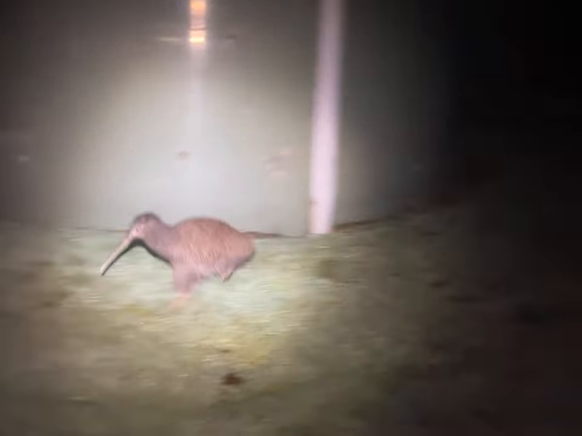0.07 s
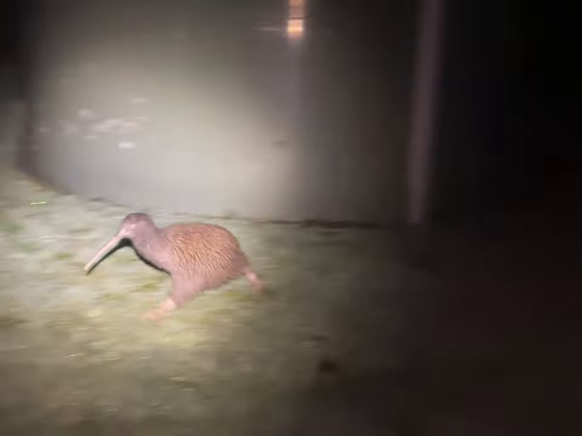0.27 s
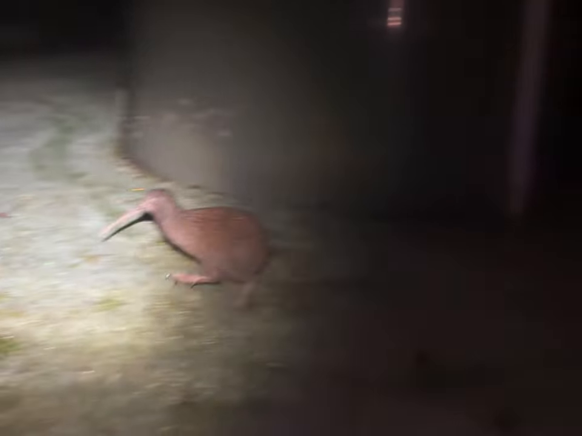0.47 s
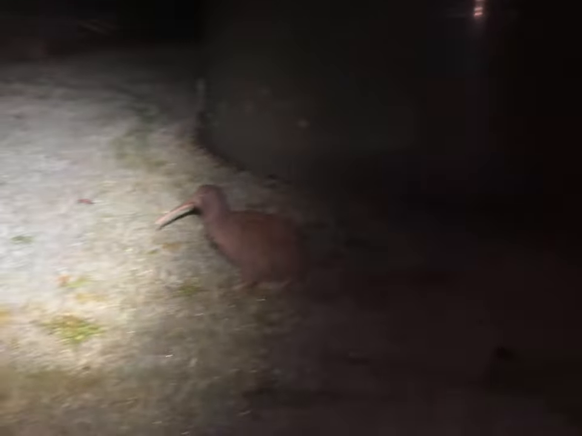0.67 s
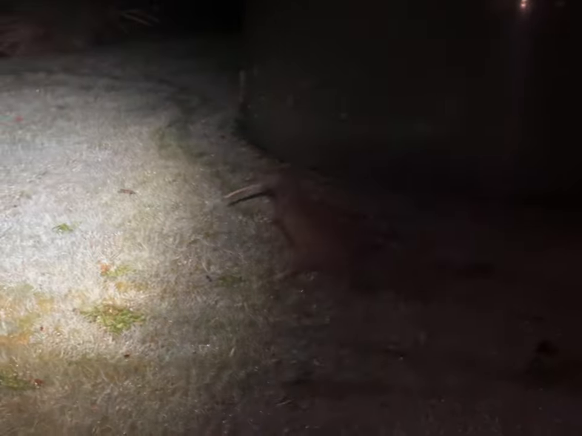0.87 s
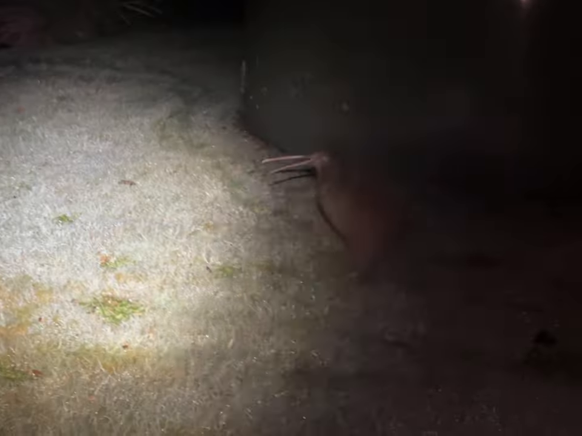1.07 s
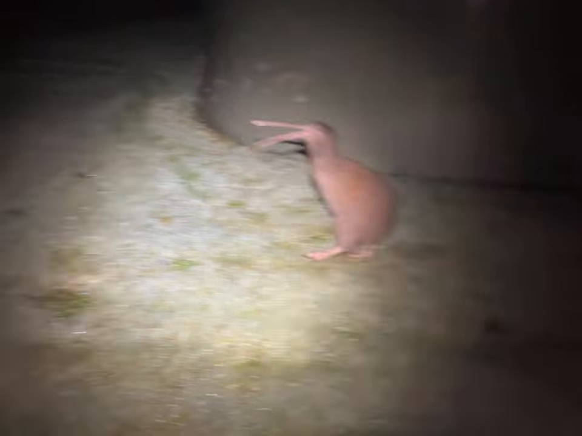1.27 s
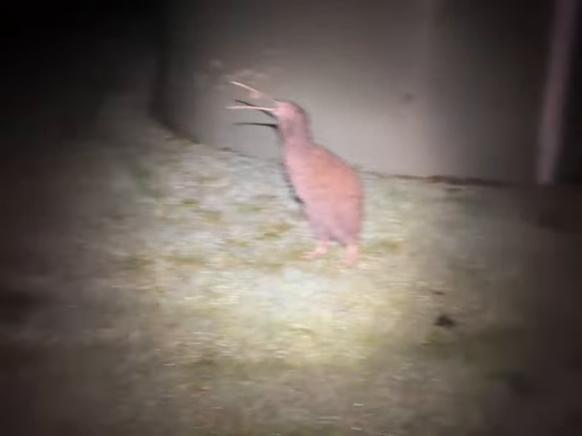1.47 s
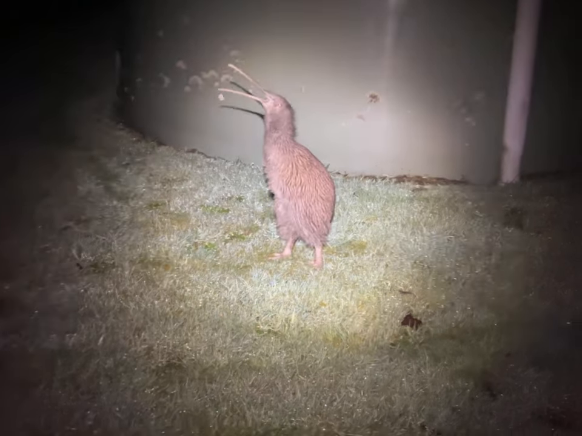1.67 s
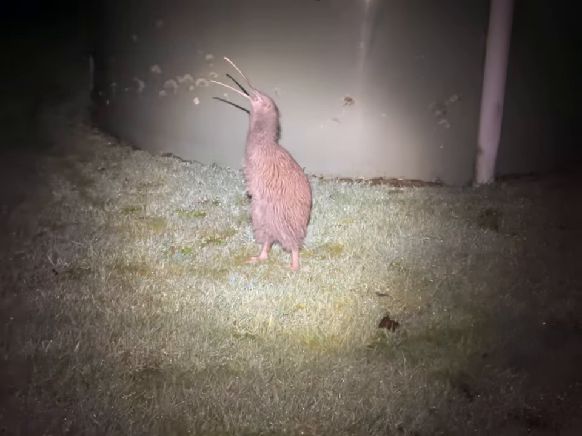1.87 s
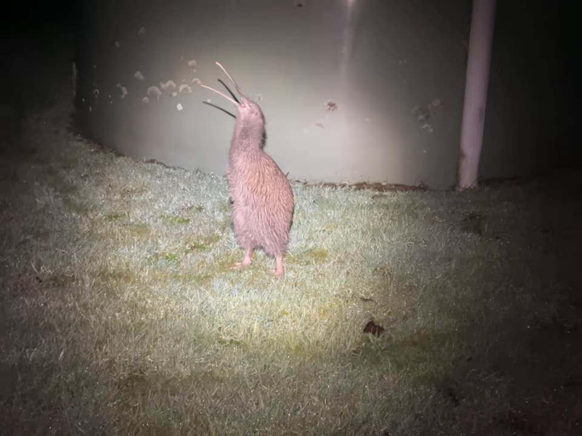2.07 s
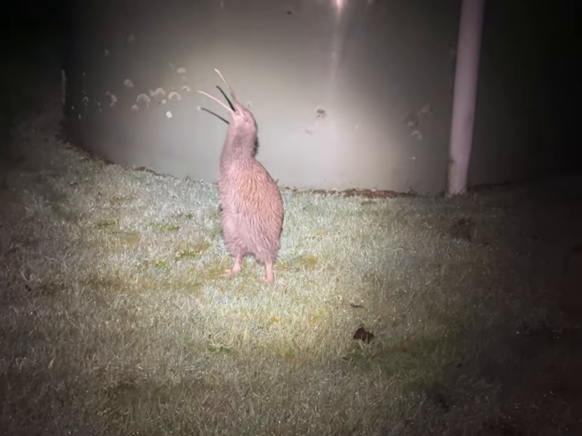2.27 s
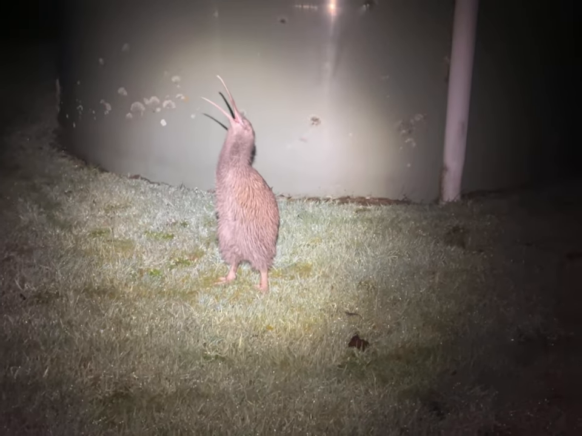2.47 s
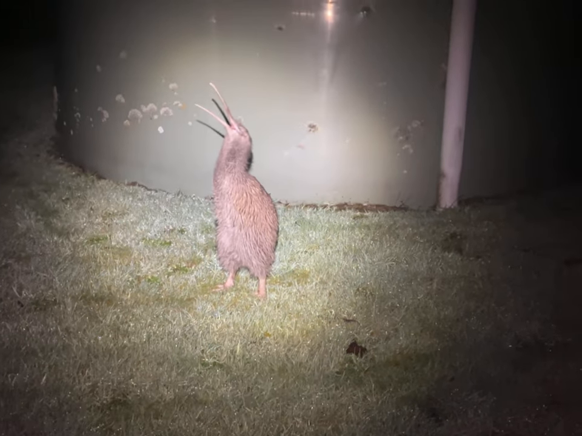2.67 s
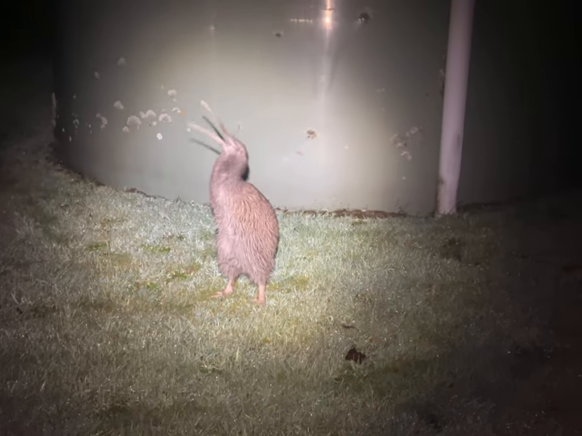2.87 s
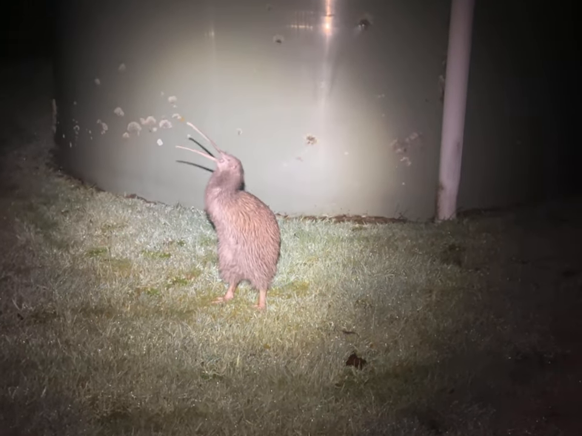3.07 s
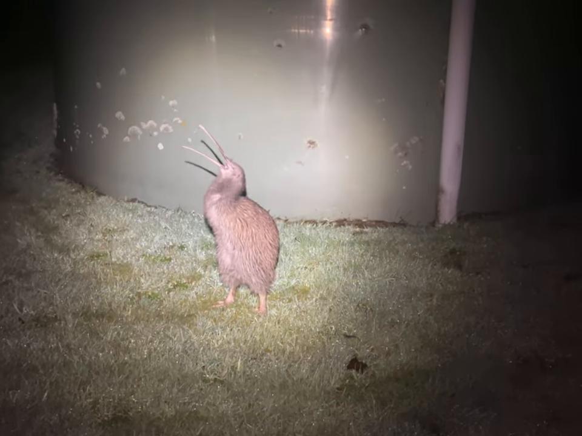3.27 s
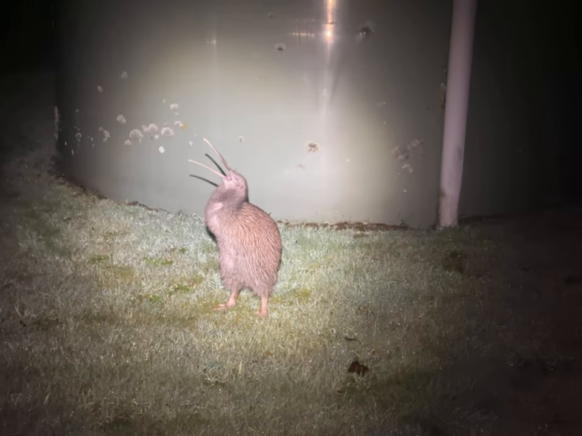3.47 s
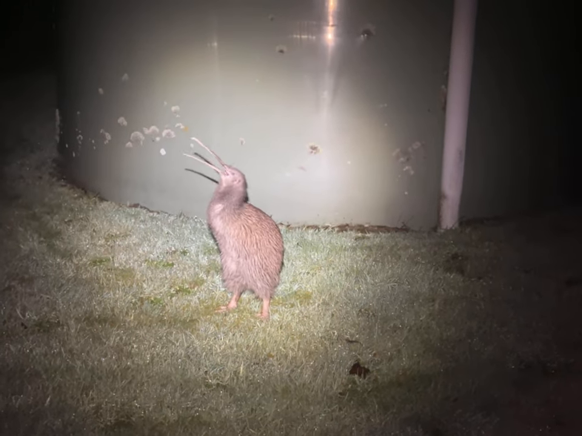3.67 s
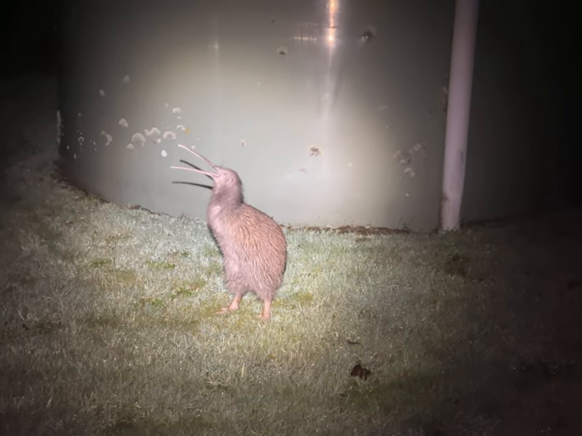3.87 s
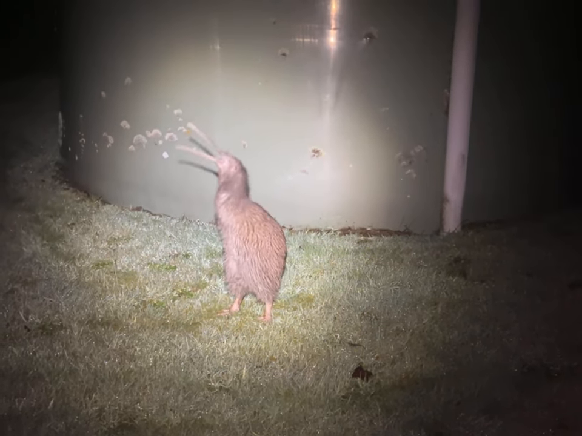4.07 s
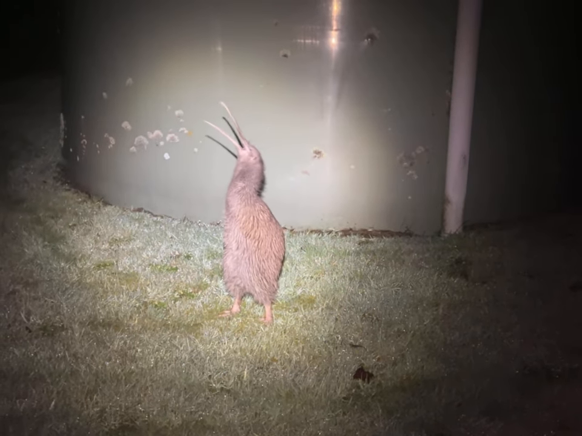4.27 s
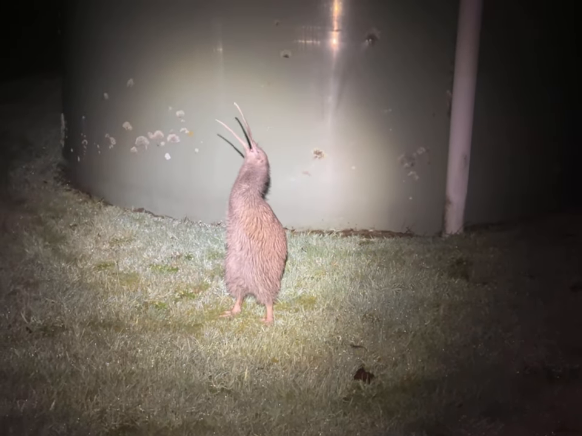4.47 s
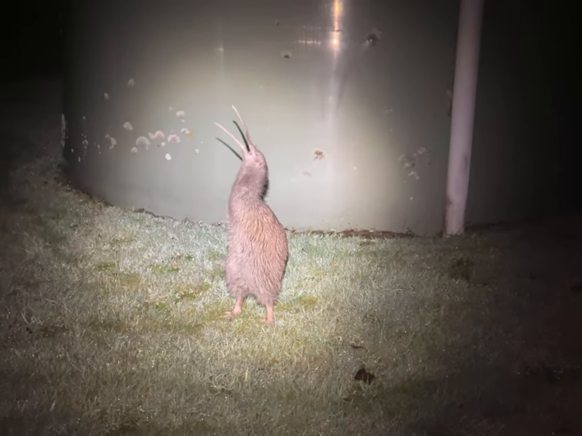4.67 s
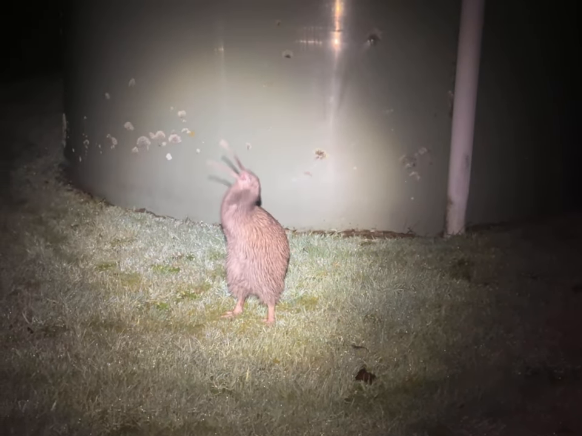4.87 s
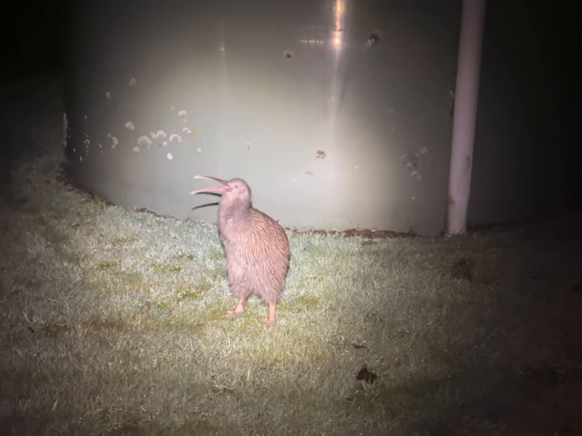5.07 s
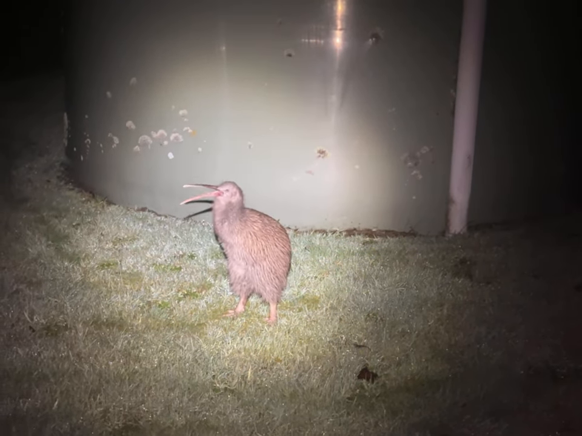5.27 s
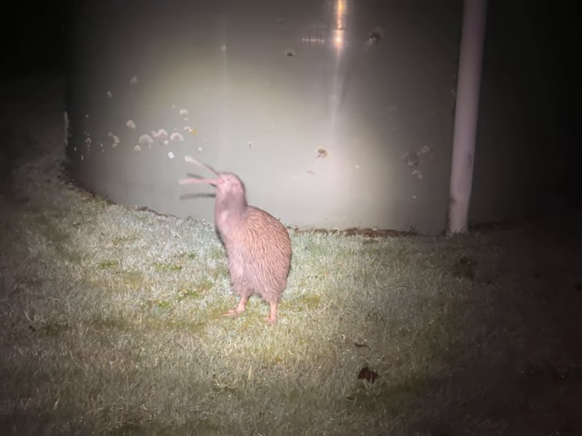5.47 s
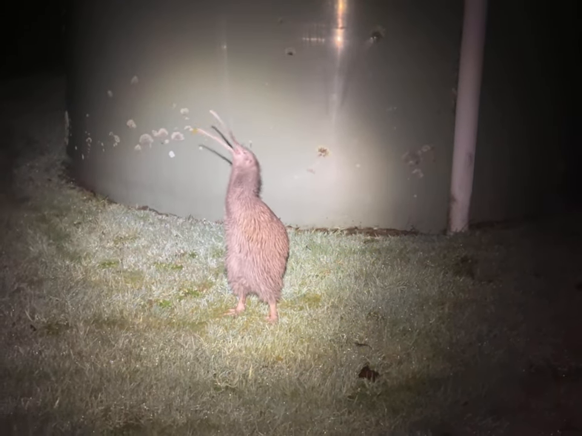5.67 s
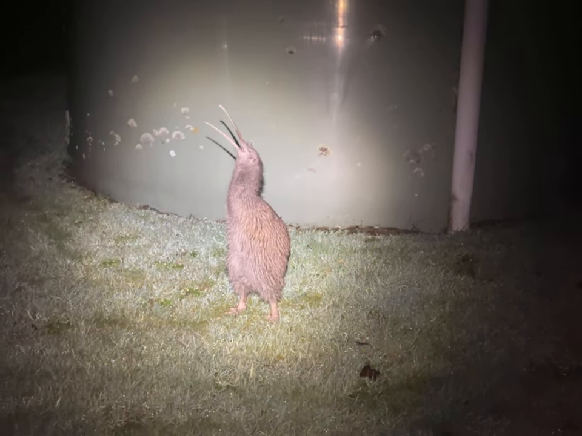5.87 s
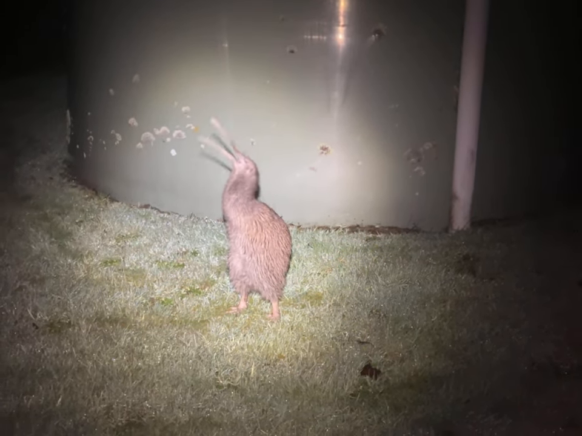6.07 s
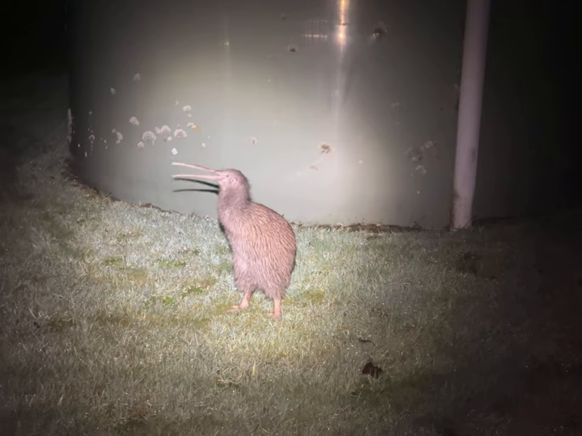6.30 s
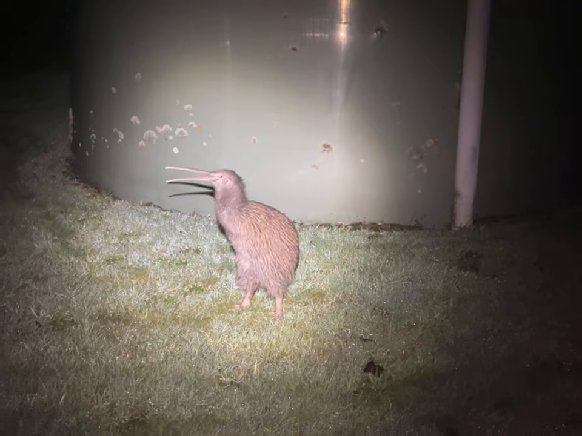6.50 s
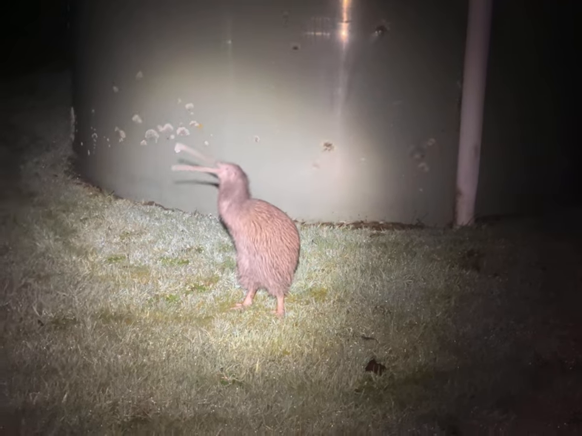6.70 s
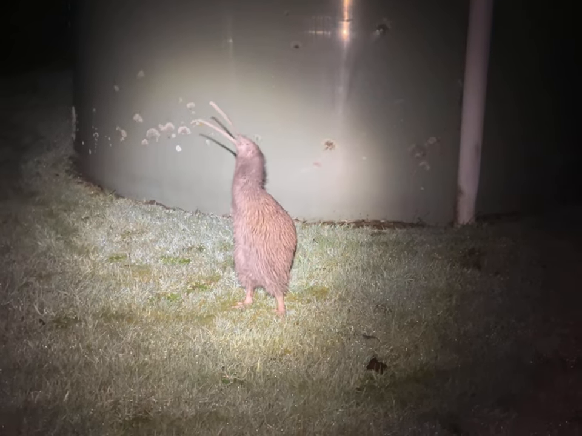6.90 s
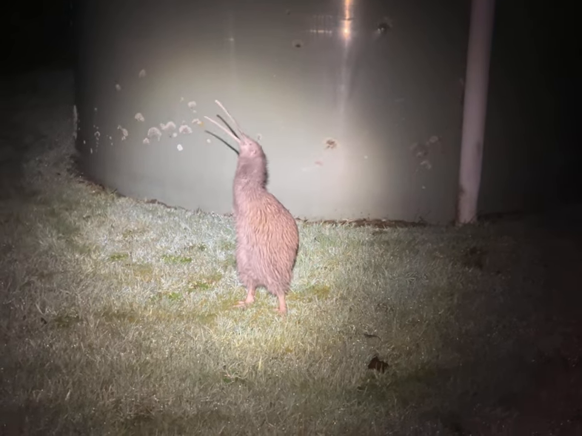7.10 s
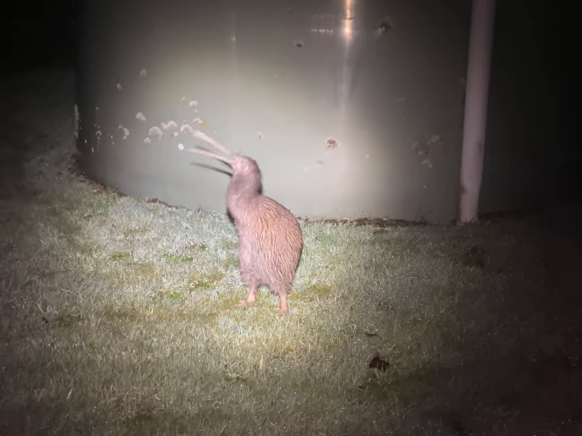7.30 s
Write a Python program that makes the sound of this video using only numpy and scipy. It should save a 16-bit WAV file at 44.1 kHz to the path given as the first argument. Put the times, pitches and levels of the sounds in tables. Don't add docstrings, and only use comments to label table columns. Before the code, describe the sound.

Quiet night air with a faint low rumble. A bird's feet crackle softly over grass for about a second, with a tiny snap or two. It then screams: one long raspy cry of two and a half seconds, followed by three progressively shorter, rougher ones with brief gaps. Each ends in a soft throaty gulp. Heard outdoors from a few metres, with short hard reflections off a nearby tank.

```python
import sys
import numpy as np
from scipy import signal
from scipy.fft import rfft, irfft, next_fast_len
from scipy.io import wavfile
from scipy.ndimage import uniform_filter1d, map_coordinates

SR = 44100
rng = np.random.default_rng(int(sys.argv[2]) if len(sys.argv) > 2 else 0)


def wrap_up_sound(samples):
    columns = np.atleast_2d(samples).T
    tamed = np.clip(columns, -1, 1)
    steps = np.round(tamed * 32767).astype(np.int16)
    wavfile.write(sys.argv[1], SR, steps)


def to_linear_factor(level_db):
    exponent = np.asarray(level_db, float) / 20
    return 10 ** exponent


N = 323694

# [start t/s, end t/s, chest hum level/dB, hoarseness (0-2), pocket slackness (0-1)]
CALLS = [
    (1.071, 3.584, -46, 0.25, 0.01),
    (3.869, 4.981, -44, 1.24, 0.35),
    (5.298, 6.168, -42, 0.87, 0.41),
    (6.547, 7.342, -41.5, 1.1, 0.54),
]
# [t/s, rasp level/dB]
BREATH_EFFORT = [
    [(1.17, -27), (1.36, -20), (2.5, -21), (2.85, -23.5), (2.94, -31), (3.36, -30), (3.44, -27.5),
     (3.53, -29)],
    [(3.99, -25.5), (4.08, -22.5), (4.18, -19.5), (4.66, -19), (4.79, -21.5), (4.89, -23), (4.93, -25)],
    [(5.4, -22), (5.55, -21.5), (5.7, -22), (5.89, -25), (6.02, -27), (6.11, -28)],
    [(6.65, -24.5), (6.84, -25), (7.03, -29), (7.18, -33), (7.27, -36)],
]


def unit(x):
    return x / np.sqrt(np.mean(x ** 2) + 1e-20)


def along(points, hz):
    f, v = np.transpose(points)
    return np.interp(np.log(hz + 1), np.log(f + 1), v)


def columns(rows, x):
    first, *rest = np.transpose(rows)
    return [np.interp(x, first, c) for c in rest]


def each(tables, which, t, power):
    curves = []
    for table in tables:
        s, value = np.transpose(table)
        curves.append(np.interp(t, s, value ** power) ** (1 / power))
    return np.choose(which, curves)


def wobble(rate):
    knots = rng.standard_normal(int(N * rate / SR) + 4)
    return map_coordinates(knots, [np.arange(N) * rate / SR])


def coloured(x, spectrum):
    m = next_fast_len(N + 8192)
    gain = to_linear_factor(along(spectrum, np.fft.rfftfreq(m, 1 / SR)))
    return irfft(rfft(x, m) * gain, m)[:N]


def swell(t, centre_s, half_s):
    return np.exp(-0.5 * ((t - centre_s) / half_s) ** 2)


def pair(f, zero_hz, zero_width_hz, pole_hz, pole_width_hz):
    zero = zero_hz ** 2 - f * f + 1j * f * zero_width_hz
    return zero / (pole_hz ** 2 - f * f + 1j * f * pole_width_hz)


def bump(f, hz, width_hz, db):
    width = np.abs(width_hz)
    return pair(f, hz, width * to_linear_factor(np.maximum(db, 0)), hz, width * to_linear_factor(np.maximum(-db, 0)))


def band_db(response, f, lo_hz, hi_hz):
    inside = (f > lo_hz) * (f < hi_hz)
    return 10 * np.log10(np.mean(np.abs(response) ** 2 * inside, axis=0))


def moment(t):
    # [t/s after the start, rasp level/dB, then over the rasp: ring, chest, air level/dB]
    opening = [
        (.01, -58.5, -2.5, 32.5, 13.5),
        (.03, -17.5, 10.5, 21, 3),
        (.056, -5, 3.5, 11, 5),
        (.13, 0, -0.5, 0, -0.5),
    ]
    # [t/s from the end, rasp, ring, chest, air level/dB]
    shutting = [
        (-.06, 0, -0.5, -0.5, -1),
        (-.032, -6.5, 5, 18.5, 0.5),
        (-.011, -41, -0.5, 14.5, 7),
        (0, -42, -11, 1, -3),
    ]
    start, end = np.transpose(CALLS)[:2]
    which = np.searchsorted(start[1:] - 0.1, t)
    age = t - start[which]
    return which, age, np.add(columns(opening, age), columns(shutting, t - end[which]))


def syrinx(rate, scatter_db, air_share, spit_db):
    which, age, _ = moment(np.arange(N) / SR)
    hoarse = np.array(CALLS)[which, 3] * (1 - 0.27 * np.exp(-np.abs(age) / 0.47))
    slaps = (rng.random(N) < rate / SR) * to_linear_factor(scatter_db * rng.standard_normal(N))
    share = np.clip(air_share, 0, 1)
    membranes = np.sqrt(1 - share) * unit(slaps - slaps.mean())
    flow = membranes + np.sqrt(share) * rng.standard_normal(N)
    treble = coloured(flow, [(3000, -40), (5000, 0)])
    spit = unit(to_linear_factor(hoarse * spit_db * (wobble(25) + wobble(90) + wobble(300))))
    flutter_db = hoarse * (0.29 * wobble(7) + 0.14 * wobble(30) + 0.99 * wobble(150))
    return unit((flow + treble * (spit - 1)) * to_linear_factor(flutter_db))


def throat_pocket(f, notch, ring, tight, damping, clarity, fill):
    # [lowest notch f/Hz, ring width/Hz, upper ring f/Hz, its width/Hz, its level/dB]
    volume_law = [(1248, 400, 1930, 920, 5.5), (1400, 71, 2176, 490, 5), (1900, 50, 3140, 990, 5.5),
                  (2400, 63, 3700, 160, 8.5), (2700, 150, 3650, 150, -1), (3590, 190, 3250, 960, 15)]
    # [multiple of notch, width/Hz, level/dB]
    shadows = [(1.14, 299.7, -4), (2.6, 350, -3.5)]
    ring_width, *upper_ring = columns(volume_law, notch)
    h = pair(f, notch, damping * notch, ring, ring_width / clarity) * bump(f, *upper_ring)
    h *= bump(f, ring, ring_width, clarity)
    for multiple, width, db in shadows:
        h *= bump(f, multiple * notch, width, db * (1 - tight) * fill)
    return h * bump(f, 1950 + 0.27 * notch, 150, -20 * np.clip((notch - 2720) / 200, 0, 1))


def notch_ladder(f, second, tight, head_share, fill, age):
    # [multiple of second notch when slack, when tight, width/Hz, level/dB]
    rungs = [(1, 1, 170, -13), (1.53, 1.43, 220, -12), (2, 2.03, 260, -15), (2.33, 2.33, 260, -12),
             (2.7, 2.7, 300, -11), (2.98, 3.1, 300, -8), (3.2, 3.2, 350, -7)]
    head_low = 0.88
    depth = np.clip((head_share - head_low) / (1 - head_low), 0.3, 1)
    h = bump(f, 1.25 * second, 1100, 9 * tight * depth * np.exp(-np.abs(age) / 0.25))
    for slack, taut, width, db in rungs:
        kept = fill if 1 < slack < 2.2 else 1
        h *= bump(f, (slack + tight * (taut - slack)) * second, width, db * depth * kept)
    return h


def windpipe(f, pitch, clarity):
    # [f/Hz, width/Hz, level/dB]
    modes = [(742, 90, -2), (1500, 260, 6.5), (1952, 39.5, 9), (2250, 250, -1), (2470, 33, 7),
             (2888, 50, 5.5), (3316, 1300, 5.5), (4200, 430, -1.5), (4130, 290, 4.5)]
    h = 1
    for hz, width, db in modes:
        h = h * bump(f, hz * pitch, width, db * clarity)
    return h


def chest_mode(f, lowest_hz, peak_db, pocket_rise_hz, tight):
    risen_hz, pull_hz = 408, 200
    chest = risen_hz - (risen_hz - lowest_hz) * np.exp(-pocket_rise_hz / pull_hz)
    peak_db = np.maximum(peak_db - 10 * tight, 1)
    h = bump(f, chest, 52 - 1.3 * peak_db, 1.45 * peak_db)
    h *= bump(f, 0.76 * chest, 60, -0.3 * peak_db)
    return h * bump(f, 1.45 * chest, 220, -0.5 * peak_db)


def microphone(f):
    # [f/Hz, width/Hz, level/dB]
    port_modes = [(8250, 460, 4), (8950, 260, -5.5), (10490, 440, 3.5), (13900, 1200, 5.5)]
    h = 1
    for mode in port_modes:
        h = h * bump(f, *mode)
    return h


def balance(h, f, notch, chest_db, ring_db, air_db):
    h = h / to_linear_factor(band_db(h, f, 1900, 6000))
    low = 1 / (1 + (f / 800) ** 8)
    high = 1 / (1 + (6500 / (f + 1)) ** 8)
    middle = 1 / (1 + (f / notch) ** 12) - low
    bands = [(low, 300, 800, chest_db), (middle, 850, 1800, ring_db), (high, 7000, 15000, air_db)]
    for share, lo, hi, db in bands:
        h *= to_linear_factor(share * (db - band_db(h, f, lo, hi)))
    return h


def tract(f, t):
    # [t/s, f/Hz]
    pocket_curves = [
        [(1.19, 2400), (1.3, 1700), (1.52, 1461), (2.4, 1361), (2.78, 1500), (2.95, 2610), (3.32, 2700),
         (3.38, 3300), (3.55, 3680)],
        [(3.88, 1920), (3.935, 2250), (3.975, 3050), (4.015, 3100), (4.1, 1660), (4.24, 1458), (4.76, 1520),
         (4.91, 3035), (4.97, 3120)],
        [(5.32, 2000), (5.37, 2200), (5.415, 2950), (5.45, 2900), (5.55, 1586), (5.65, 1280), (5.92, 1300),
         (6.04, 1476), (6.15, 2290)],
        [(6.56, 1900), (6.62, 2090), (6.655, 2490), (6.69, 2400), (6.8, 1500), (6.9, 1135), (7.15, 1190),
         (7.24, 1460), (7.33, 2210)],
    ]
    # [lowest notch f/Hz, second notch f/Hz]
    second_notch = [(1190, 4090), (1430, 4080), (1600, 4450), (2000, 5500), (2650, 6600), (3000, 7250),
                    (3300, 7850), (3700, 8050)]
    # [lowest notch f/Hz, ring f/Hz, ring over rasp level/dB, air over rasp level/dB]
    ring_law = [(1190, 1140, 5, -30), (1330, 1040, -10, -30.5), (1373, 1078, -8, -29),
                (1590, 1178, -2.5, -30), (2000, 1340, 5, -27.5), (2480, 1470, 9.5, -25),
                (3300, 1503, 5.5, -28)]
    # [t/s, half length t/s, level/dB]
    flares = [
        (4.857, 0.016, 9),
        (3, 0.0067, -6),
        (7.29, .03, 3.5),
        (1.6, 0.12, 2),
    ]
    # [lowest mode f/Hz, its peak level/dB, slack ring level/dB, slack pitch factor]
    neck_posture = [
        (341.5, 16.8, 2.5, 1.038),
        (383.6, 17.5, -4.5, 0.97),
        (370, 9, 3, 0.987),
        (376, 2.3333, 5, 0.96),
    ]
    # [t/s, windpipe pitch factor, windpipe clarity (0-2)]
    neck_motion = [(1.1, 1.09, 1.08), (1.5, 0.88, 1.15), (2.3, 1.08, 1.18), (2.7, 0.93, 1.1),
                   (3.0, 1.18, 0.95), (3.57, 1.18, 0.91), (3.9, 0.96, .65), (4.2, 1.07, 1.14),
                   (4.95, 0.9, 0.88), (5.33, 1.01, 0.93), (5.6, 1.09, 0.69), (6.0, 1.02, 1.3),
                   (6.17, 0.98, 0.12), (6.57, 1.14, 0.68), (7.2, .97, 0.68)]
    # [t/s, pocket pitch factor, chest level/dB, air level/dB, beak lift level/dB]
    rising_head = [
        (1.1, 0.82, -9.5, 1.5, 29.5),
        (1.2, 0.92, 2, 7.5, 17.5),
        (1.32, 0.93, -2, 4.5, 2.5),
        (1.5, 0.99, 0, 0.5, 0),
    ]
    # [air level/dB, lift near 11 kHz at start level/dB, later level/dB, near 7 kHz level/dB]
    beak_aim = [
        (1.5, 1.5, 3, 0),
        (0, 8, -3, -5.5),
        (2, -6.5, -4.5, -8),
        (-.5, 5, 0, -8.5),
    ]
    # [f/Hz, level/dB per Hz]
    source_spectrum = [(120, -60.5), (280, -51), (500, -34), (1000, -20.5), (2000, -8.5), (3000, 0.5),
                       (4500, -6.5), (6500, -20.5), (8000, -31.5), (12000, -33.5), (16000, -39.5)]
    which, age, (_, ring_edge_db, chest_edge_db, air_edge_db) = moment(t)
    hum_db, _, slackness = np.array(CALLS)[which, 2:].T
    chest_hz, peak_db, slack_ring_db, slack_pitch = np.array(neck_posture)[which].T
    breath_db, first_lift_db, later_lift_db, dip_db = np.array(beak_aim)[which].T
    head, head_db, head_air_db, head_lift_db = columns(rising_head, t)
    head_share = head / head[-1]
    pitch, clarity = columns(neck_motion, t)

    notch = each(pocket_curves, which, t, power=-2.0)
    slack_hz, tight_hz = 1432, 2200
    tight = np.clip((notch - slack_hz) / (tight_hz - slack_hz), 0, 1)
    slackening = np.clip(age / 0.27, 0, 1.5)
    damping = 0.022 + np.abs(slackness) * (1 - tight) * slackening
    fill = np.clip(1 - 1.5 * np.abs(slackness), 0.35, 1)
    ring, ring_db, air_db = columns(ring_law, notch)
    ring = uniform_filter1d(ring * head * slack_pitch ** (1 - tight), size=5)
    second = columns(second_notch, notch)[0] * head_share
    lowest_notch = np.array([min(hz for _, hz in curve) for curve in pocket_curves])[which]

    ring_db += slack_ring_db * (1 - tight) + ring_edge_db
    ring_db += sum(db * swell(t, s, half) for s, half, db in flares)
    chest_db = hum_db - each(BREATH_EFFORT, which, t, power=1) + chest_edge_db + head_db
    air_db += breath_db + air_edge_db + head_air_db

    h = throat_pocket(f, notch, ring, tight, damping, clarity, fill) * to_linear_factor(along(source_spectrum, f))
    h *= notch_ladder(f, second, tight, head_share, fill, age)
    h *= windpipe(f, pitch, clarity)
    h *= chest_mode(f, chest_hz, peak_db, notch - lowest_notch, tight)
    lift_db = later_lift_db + head_lift_db + 4 * tight + first_lift_db * np.exp(-np.abs(age) / 0.089)
    h *= bump(f, 11000, 2200, lift_db) * bump(f, 7000, 1800, dip_db - 0.61 * lift_db)
    return balance(h * microphone(f), f, notch, chest_db, ring_db, air_db)


def bird():
    now = np.arange(N) / SR
    which, _, edge_db = moment(now)
    level_db = each(BREATH_EFFORT, which, now, power=1) + edge_db[0]
    sounding = sum((now > call[0]) & (now < call[1]) for call in CALLS)
    flow = syrinx(rate=1500, scatter_db=0.5, air_share=0.56, spit_db=1.94) * to_linear_factor(level_db) * sounding
    flow *= to_linear_factor(np.interp(now, [1.105, 1.135], [-9, 0]))
    hz, t, z = signal.stft(flow, SR, nperseg=1536, noverlap=1152)
    return signal.istft(z * tract(hz[:, None], t), SR, nperseg=1536, noverlap=1152)[1][:N]


def squeak():
    # [t/s, f/Hz, level/dB]
    clean_tone = [
        (1.092, 1126, -64),
        (1.096, 1166, -39.5),
        (1.1, 1140, -48.5),
        (1.103, 1134, -26.5),
        (1.118, 1147, -25.5),
        (1.14, 1180, -55.5),
    ]
    now = np.arange(N) / SR
    s, hz, db = np.transpose(clean_tone)
    phase = 2 * np.pi * np.cumsum(np.interp(now, s, hz)) / SR
    return np.sqrt(2) * np.sin(phase) * to_linear_factor(np.interp(now, s, db, left=-200, right=-200))


def gulps():
    # [t/s, level/dB]
    closures = [
        (3.565, -49.5),
        (4.964, -46),
        (6.165, -53.5),
        (7.324, -46),
    ]
    out, t = np.zeros(N + SR), np.arange(SR // 10) / SR
    for s, db in closures:
        knock = np.sin(2 * np.pi * 190 * t) * (1 - np.exp(-t / 0.0044))
        out[round(s * SR):][:len(t)] += to_linear_factor(db + 12.5 - 60 * t / 0.017) * knock
    return out[:N]


def yard(x, tail_db):
    # [f/Hz, t60/s]
    decay_times = [(300, .35), (800, 1), (1100, 1), (1400, 0.62), (2000, 0.75), (4200, .75), (6500, .35),
                   (12000, 0.73)]
    # [delay t/s, level/dB]
    echoes = [
        (.011, -17.5),
        (.021, -17),
        (.08, -34),
        (.15, -40.5),
    ]
    hz, t, z = signal.stft(rng.standard_normal(SR), SR, nperseg=256)
    decay = to_linear_factor(-60 * t / along(decay_times, hz)[:, None])
    tail = signal.istft(z * decay, SR, nperseg=256)[1]
    answer = np.pad(to_linear_factor(tail_db) * tail / np.linalg.norm(tail), (600, 0))
    for delay, db in echoes:
        answer[round(delay * SR)] += to_linear_factor(db)
    reflected = signal.fftconvolve(x, answer)[:N]
    return coloured(reflected, [(400, 7.0), (1400, 4), (4000, 0.5), (10000, 4.5)])


def feet():
    # [t/s, half length t/s, level/dB, dullness level/dB]
    footfalls = [
        (0.11, 0.011, -68.5, -3),
        (.32, 0.017, -71.5, 5),
        (.6, 0.045, -68, -16),
        (0.916, 0.05, -77.5, 0),
        (0.69, .015, -83, 0),
        (0.34, .02, -89, 0),
    ]
    # [t/s, peak level/dB, f/Hz]
    stalks = [
        (0.0992, -58, 2300),
        (0.3292, -44, 3460),
        (0.5744, -56, 3400),
        (0.7794, -66, 2230),
        (1.0534, -82, 1990),
    ]
    # [f/Hz, level/dB per Hz]
    blade_spectrum = [(350, -27), (600, 3.5), (967, -8), (1170, -13), (1560, -12), (1890, -24),
                      (2550, -11.5), (6980, -18), (10100, -13), (15600, -15)]
    now = np.arange(N) / SR
    crackle = rng.standard_normal(N) * to_linear_factor(2.8 * wobble(300))
    crisp = unit(coloured(crackle, blade_spectrum))
    dull = unit(coloured(crackle, [(500, -7), (2000, -3.5), (5000, -14)]))
    out = np.zeros(N)
    for s, half, db, dull_db in footfalls:
        out += to_linear_factor(db) * swell(now, s, half) * (crisp + to_linear_factor(dull_db - 4) * dull)
    t = np.arange(200) / SR
    for s, db, hz in stalks:
        out[round(s * SR):][:len(t)] += to_linear_factor(db - 60 * t / 0.0016) * np.sin(2 * np.pi * hz * t)
    return out


def feathers():
    # [t/s, half length t/s, level/dB]
    settlings = [
        (3.67, 0.064, -70.5),
        (5.075, 0.051, -74.5),
        (6.28, .06, -83),
    ]
    # [f/Hz, level/dB per Hz]
    feather_spectrum = [(7000, -19), (9000, -12), (11500, -7.5), (13500, -8.5), (16000, -35)]
    now = np.arange(N) / SR
    rustle = unit(coloured(rng.standard_normal(N) * to_linear_factor(2.2 * wobble(200)), feather_spectrum))
    return sum(to_linear_factor(db) * swell(now, s, half) for s, half, db in settlings) * rustle


def hush():
    # [f/Hz, level/dB per Hz]
    night_spectrum = [(15, -51.5), (25, -16), (91, -2), (188, -9), (332, -11.5), (400, -12.5), (600, -10),
                      (724, -16), (807, -15), (1380, -23), (1910, -24.5), (2070, -24), (2430, -25.5),
                      (5310, -23), (15600, -45.5)]
    now = np.arange(N) / SR
    night = unit(coloured(rng.standard_normal(N), night_spectrum))
    hiss = coloured(night, [(2000, -40), (4500, 0)])
    rumble = (night - hiss) * to_linear_factor(4.5 - 0.7 * now + 0.8 * wobble(4.5))
    ducked_hiss = hiss * to_linear_factor(-3 - 2 * (now > CALLS[0][0]))
    return to_linear_factor(-71) * (rumble + ducked_hiss)


def scene():
    voice = bird() + squeak() + gulps()
    return (voice + yard(voice, tail_db=-28.5) + feet() + feathers() + hush())[None]


def band_limit(x):
    return signal.sosfilt(signal.butter(12, 15750, fs=SR, output="sos"), x)


def record(dry):
    kept = coloured(dry[0], [(20, -21), (40, -11), (70, 0.0), (100, -0.93)])
    top_hz = 15735
    kept = coloured(kept, [(top_hz, 0), (top_hz + 10, -90)])
    return band_limit(kept[None])


dry = scene()
out = record(dry)
wrap_up_sound(out)
```